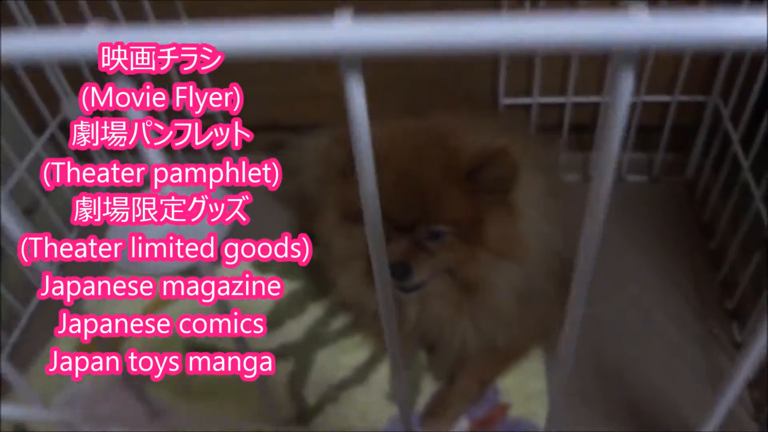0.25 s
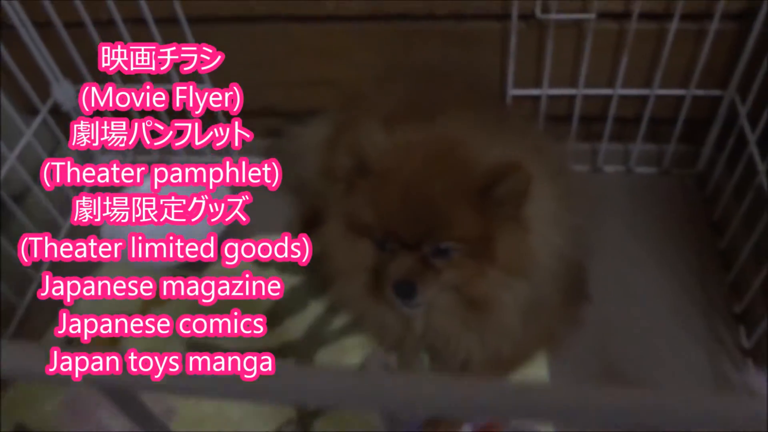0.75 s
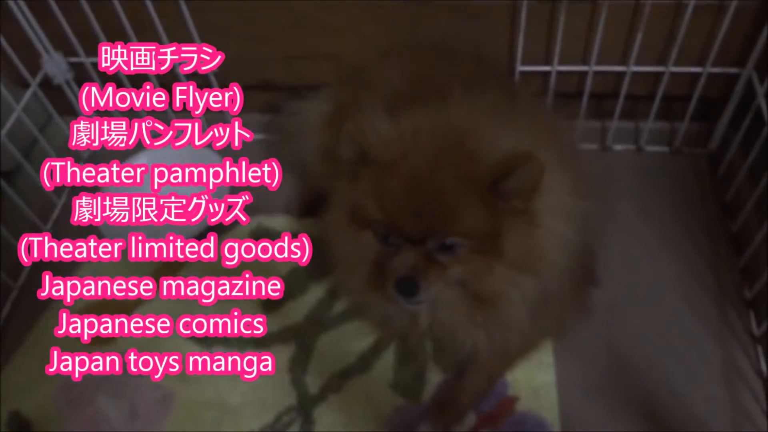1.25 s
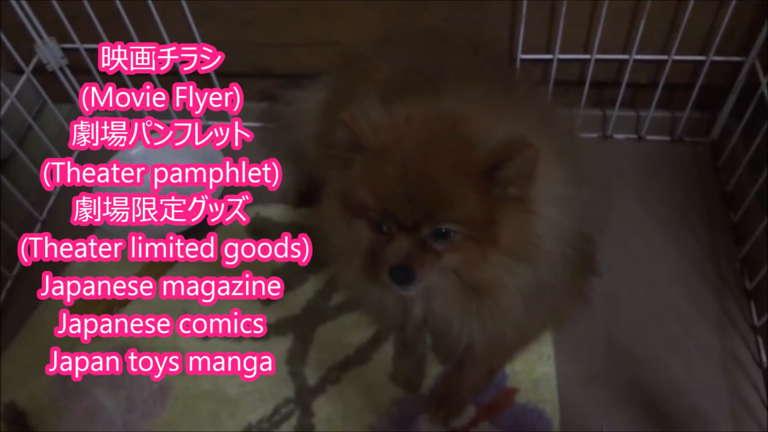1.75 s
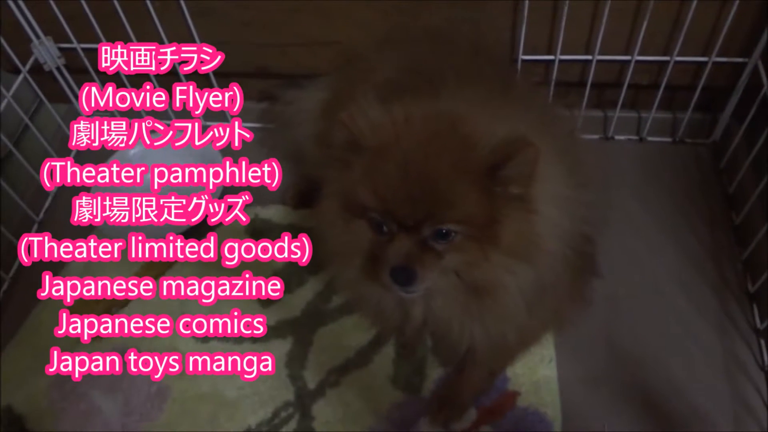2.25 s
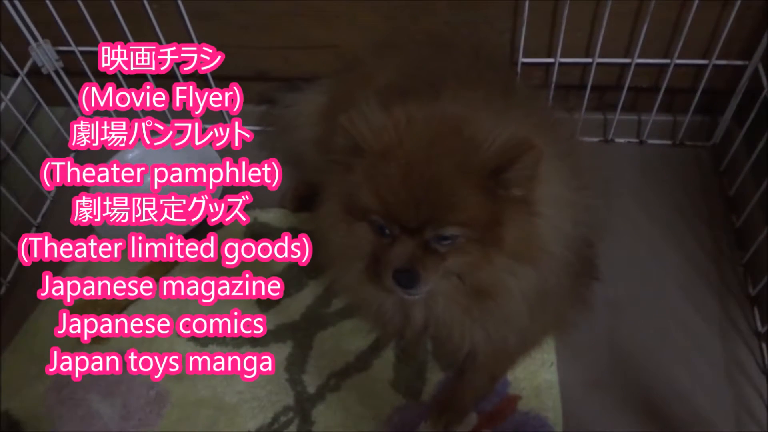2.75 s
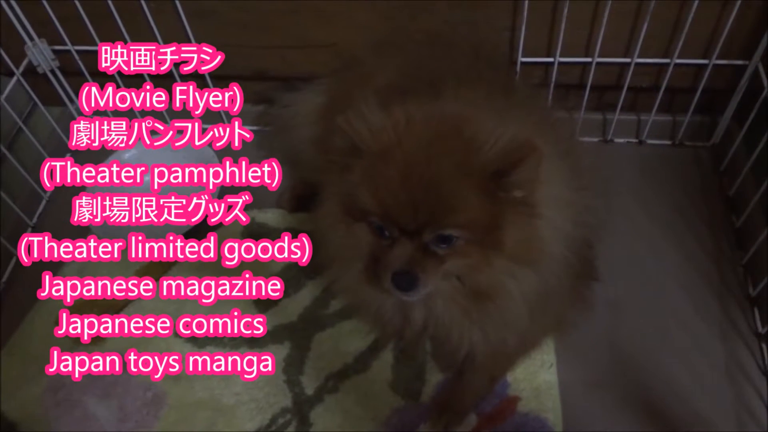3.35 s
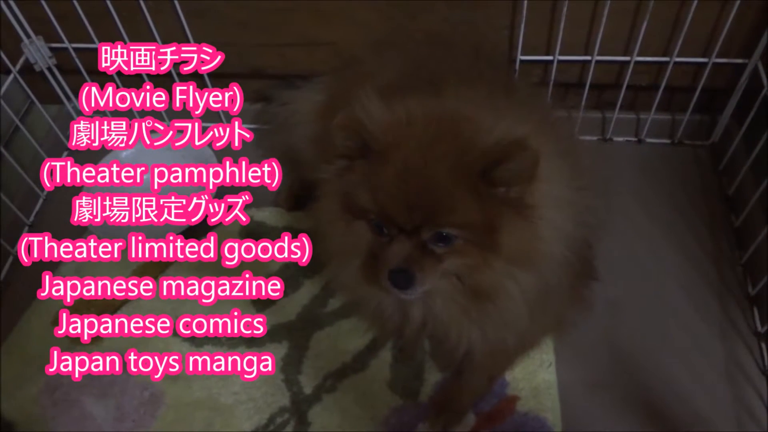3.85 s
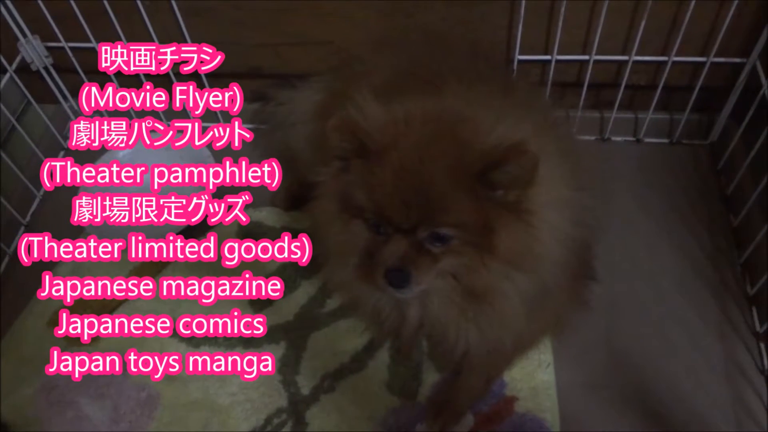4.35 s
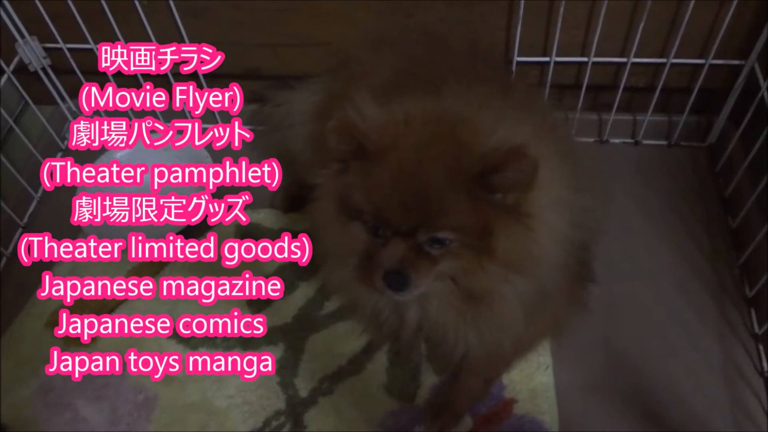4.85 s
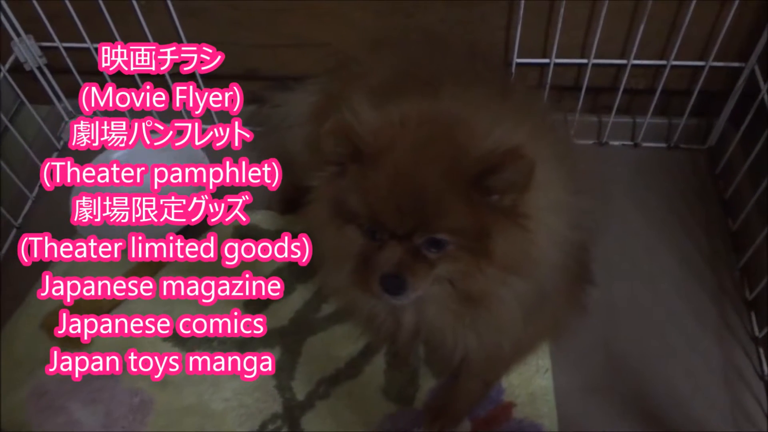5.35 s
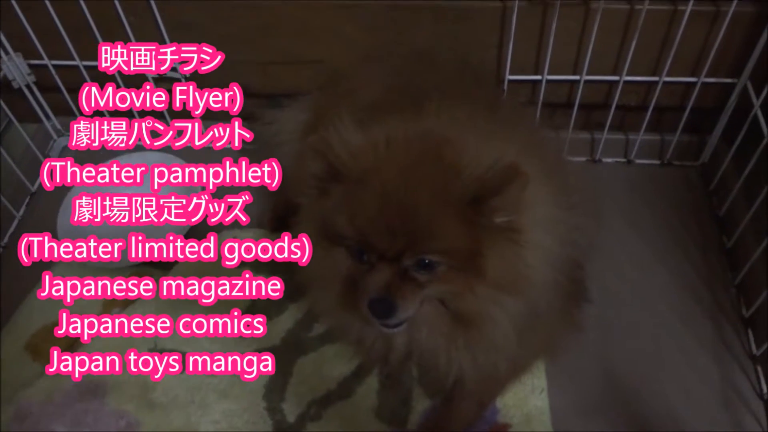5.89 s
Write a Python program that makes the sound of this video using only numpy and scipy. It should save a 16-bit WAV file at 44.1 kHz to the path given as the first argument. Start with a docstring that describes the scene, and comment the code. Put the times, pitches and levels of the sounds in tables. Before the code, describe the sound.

A small dog snorts and sniffs close by, then growls twice, first sinking into a moan, then rising into a snarl.

```python
"""A small dog snorts, grunts, sniffs and growls twice in a wire pen, close to a stereo microphone.
Each growl is a low voice chopped into throbs, about 23 a second; the first smooths out into a
sinking moan, the second opens into a snarl. Air hisses through the nose along with the voice,
and the soft palate flaps in the snorts and sniffs. Behind the dog lies a small, quiet room
with faint hiss and a low electric hum."""
import sys
import numpy as np
from scipy import signal
from scipy.fft import rfft, irfft
from scipy.io import wavfile
from scipy.ndimage import uniform_filter1d

SR = 44100
rng = np.random.default_rng(int(sys.argv[2]) if len(sys.argv) > 2 else 0)


def file_out(sig):
    """Save sig as 16-bit WAV at sys.argv[1]."""
    # one column per channel
    cols = np.atleast_2d(sig).T
    # limit, then scale
    lim = np.clip(cols, -1, 1)
    pcm = np.round(lim * 32767).astype(np.int16)
    wavfile.write(sys.argv[1], SR, pcm)


N = 269892
T = np.arange(N) / SR

# the two growls: (time [s], effort [dB], pitch [Hz], mouth resonance [dB], open share of a throb [0-1])
GROWL_1 = [(1.469, -42, 168.4, -3, 0.88), (1.523, -39.5, 170.5, -4, 0.82), (1.546, -28.5, 170.2, -8.5, 0.5),
           (1.722, -22.5, 169, -14.5, 0.44), (1.77, -26, 173.7, -11.5, 0.47),
           (1.804, -23.5, 194.4, -7.5, 0.78), (1.86, -23, 201.9, -11.5, 0.81),
           (2.089, -21, 206.5, -9.5, 0.85), (2.301, -23.5, 193.5, -9, 0.83),
           (2.761, -26, 185.8, -8.5, 0.87)]
GROWL_2 = [(5.081, -51.5, 196.6, -7, 0.14), (5.21, -47, 194.5, -4, 0.15), (5.28, -32.5, 195.5, -5.5, 0.14),
           (5.36, -28.5, 194.8, -6.5, 0.14), (5.43, -43, 196.6, -3.5, 0.14),
           (5.532, -27.5, 199.9, -5.5, 0.45), (5.599, -26, 203.4, -5.5, 0.27),
           (5.65, -23.5, 207.7, -5, .43), (5.751, -20.5, 220.6, -2, 0.46),
           (5.81, -23.5, 225.6, -0.5, 0.538), (6.11, -26, 246.1, 2, 0.57)]


def growl(jitter=0.045, pitch_bend=0.16, leak=0.059, air_db=-43, hiss_leak=0.32):
    """Breath drives the vocal folds in throbs and one held moan: returns voice, hiss and chest tone."""
    # the unbroken end of the first growl: (time [s], effort [dB], pitch [Hz], mouth resonance [dB])
    moan_path = [(2.8, -26.5, 181.2, -8.5), (2.88, -27.5, 171.2, -8.5), (2.931, -32.5, 172.2, -9),
                 (2.978, -29.5, 176.4, -4.5), (3.032, -30.5, 170.5, -14.5), (3.349, -32.5, 160.5, -9.5),
                 (3.5, -40, 140.7, -5.5), (3.54, -42.5, 127.1, -1), (3.568, -39, 113.5, -7.5)]
    attack_s, release_s = 0.018, 0.0236
    opening, throb_level, pop, chest_swell, arch = throbbing()
    effort_db, pitch, mouth_db = curves([row[:4] for row in [*GROWL_1, *moan_path, *GROWL_2]])
    moan_edge = np.minimum((T - moan_path[0][0]) / attack_s, (moan_path[-1][0] - T) / release_s)
    held = np.clip(1 + moan_edge, 0, 1)
    moan, moaning = gain_of(effort_db) * held, held > 0
    tight = T > GROWL_2[0][0]  # the throat tightens for the second growl
    rough, deep_db, nose_db = voicing(effort_db, mouth_db, moaning)
    # the pitch arches within each throb and is less steady when the voice is rough
    hz = pitch * (1 + pitch_bend * arch + jitter * np.sqrt(rough) * band(0, 255))
    turns = np.cumsum(hz) / SR
    folds = fold_pulses(turns, hz, rough)
    # a throb with a full chest tone starts softly, a thin one with a pop
    pop = 12 * pop / (1 + 2 * gain_of(deep_db) ** 2)
    # air escapes in one puff a cycle, and a little leaks between the throbs
    puff = evened(0.5 + np.exp(-(turns % 1) / 1.05))
    flow = np.maximum(opening, hiss_leak * np.sqrt(abs(uniform_filter1d(opening, size=6000)))) + held
    leakage = leak * uniform_filter1d(throb_level, size=3000) + gain_of(air_db) * flow * ~moaning
    effort = np.maximum(throb_level, leakage) + moan

    def drive(air_share):
        """Pops and fold pulses mixed with a share of turbulent air."""
        air_share = np.clip(air_share, 0, 1)
        air = np.sqrt(air_share) * puff * rng.standard_normal(N)
        return pop + effort * (np.sqrt(1 - air_share) * folds + air)

    snarl = np.interp(T, [5.59, 6.035], [0, 1])
    voice = throat(drive(rough), tight, snarl)
    voice += mouth(drive(6.1 * rough), mouth_db, tight)  # breathier than the throat
    voice += snarl * whine(throb_level, arch, mouth_db)
    hiss = breath_hiss(flow, puff, tight, nose_db, teeth_db=effort_db + mouth_db - 25)
    chest = gain_of(deep_db) * (chest_swell + moan) * chest_tone(turns, pitch)
    return voice, hiss, chest


def throbbing(softness=1.7, fall_s=0.0022, sag_s=0.15, chest_lag_s=0.00088, chest_ring_s=0.004027):
    """Each throb bursts open with a pop and sags as pressure drops; pitch peaks early, the chest later."""
    # how fast each growl throbs: (time [s], rate [throbs/s])
    rate_1 = [(1.468, 24.13), (1.56, 30.69), (1.68, 17.56), (1.79, 27.12), (1.9, 23.12), (2.3, 20.51),
              (2.5, 20.8), (2.782, 18.07)]
    rate_2 = [(5.081, 15.71), (5.18, 13.92), (5.26, 22.61), (5.34, 21.46), (5.44, 25.35), (5.76, 24.58),
              (5.9, 23.0), (6.12, 22.4)]
    opening, level, pop, chest_swell, arch = np.zeros((5, N))
    t = np.arange(SR // 10) / SR
    for start, length, db in [*throbs(rate_1, GROWL_1), *throbs(rate_2, GROWL_2)]:
        rise = softness * length ** 2  # long throbs open more gently
        gate = np.clip(t / rise, 0, 1) * np.clip((length - t) / fall_s + 0.5, 0, 1)
        gate *= np.exp((length / 2 - t) / sag_s)
        span = length + chest_ring_s
        hump = np.sin(np.pi * np.clip((t - chest_lag_s) / span, 0, 1) ** 0.98)
        progress = np.clip(t / span, 0, 1)
        add(opening, start, gate)
        add(level, start, gate * gain_of(db))
        add(pop, start + rise, gain_of([db]))
        add(chest_swell, start, hump * np.sqrt(2) * gain_of(db))
        add(arch, start, (np.sin(np.pi * progress ** 0.62) - np.pi / 4) * (progress < 1))
    return opening, level, pop, chest_swell, arch


def throbs(rate_path, growl_path, uneven_db=0.03, uneven_length=0.089):
    """The throat opens once a cycle, never twice alike: rows of (time [s], length [s], level [dB])."""
    rate = curves(rate_path)[0]
    effort_db, _, _, open_share = curves(growl_path)
    growling = (T > rate_path[0][0]) & (T < rate_path[-1][0])
    cycles = np.cumsum(rate * growling) / SR
    onsets = np.searchsorted(cycles, np.arange(cycles[-1] - 0.2), side="right")
    weaker, longer = rng.standard_normal((SR // 100, 2))[:len(onsets)].T
    length = np.clip(open_share[onsets] * (1 + uneven_length * longer), 0.05, 1) / rate[onsets]
    return np.transpose([T[onsets], length, effort_db[onsets + SR // 100] - uneven_db * weaker])


def voicing(effort_db, mouth_db, moaning, full_db=-22, voiced_from_db=-34, mouth_opens_db=-8.5):
    """Roughness, chest tone [dB] and nose hiss [dB] follow the effort and how open throat and mouth are."""
    slack_db = full_db - effort_db
    open_share = curves([*GROWL_1, *GROWL_2])[-1]
    # roughness doubles with every 8.5 dB of lost effort; the moan is nearly clean
    rough = np.where(moaning, 0.019, 0.1005) * 2 ** (slack_db / 8.5)
    # the chest tone grows with the open share and drops out when the effort is too weak to voice it
    throb_db = -16.5 + 20.5 * open_share - 2.9 * np.maximum(voiced_from_db - effort_db, 0)
    moan_db = 3 + 0.28 * slack_db  # in the moan it fades more slowly than the throat
    # the nose loses its air once the mouth opens
    nose_db = -39 - 0.58 * slack_db - 1.14 * np.maximum(mouth_db - mouth_opens_db, 0) * ~moaning
    return np.clip(rough, 0, 1), np.where(moaning, moan_db, throb_db), nose_db


def fold_pulses(turns, hz, rough, smear=0.1427, shimmer=0.26):
    """Slack vocal folds close gradually, so each pulse is smeared over part of its cycle."""
    harmonics = sum(np.cos(2 * np.pi * k * turns - smear * k ** 2) for k in range(2, 22))
    flutter = 1 + shimmer * np.sqrt(rough) * band(0, 470)
    return harmonics * 2 * np.sqrt(hz / SR) * flutter


def throat(source, tight, snarl, snarl_db=0.5):
    """The throat rings after each pulse; its resonances shift as it tightens, then opens to snarl."""
    # resonances of the three throat shapes: (frequency [Hz], level [dB])
    relaxed_tone = [(190, -31.5), (250, -7), (335, -2.5), (400, -13.5), (455, -2.5), (520, 2.5), (690, 5),
                    (800, 2.5), (900, -1), (1020, -22), (1110, -10), (1250, -14), (1700, -30.5),
                    (2000, -35), (6000, -78)]
    tight_tone = [(200, -22), (310, -9), (410, -21.5), (500, 0), (570, 3.5), (635, 7.5), (770, 2.5),
                  (860, -11.5), (1000, -20.5), (1230, -11.5), (1700, -46), (2000, -56), (6000, -77)]
    snarl_tone = [(200, -19), (300, -4), (400, -23.5), (490, 2), (560, 5.5), (630, 5), (770, 0.5),
                  (850, -2), (1250, -32), (1700, -33), (2000, -43), (6000, -73)]
    voice = colour(source * ~tight, relaxed_tone)
    voice += colour(source * tight * (1 - snarl), tight_tone)
    return voice + colour(source * snarl * gain_of(snarl_db), snarl_tone)


def mouth(source, mouth_db, tight, tight_db=-2):
    """Pulses and puffs of air ring the mouth cavity."""
    # mouth resonances: (frequency [Hz], level [dB])
    mouth_tone = [(900, -41), (1150, -18.5), (1280, -10), (1395, 1.5), (1460, -8.5), (1550, -23),
                  (1680, -14.5), (1870, -42.5), (2030, -44.5), (2800, -41.5), (2960, -33), (3150, -50.5),
                  (3500, -55), (6000, -60.5)]
    return colour(gain_of(mouth_db + tight_db * tight) * source, mouth_tone)


def whine(throb_level, arch, mouth_db, centre_hz=1386, lift_hz=60.19, wander_hz=54.47):
    """The snarling mouth sings at its own resonance, and the note lifts as each throb swells."""
    hz = centre_hz + lift_hz * arch + wander_hz * band(0, 300)
    tone = np.sqrt(2) * np.sin(2 * np.pi * np.cumsum(hz) / SR) * (1 + 0.35 * band(0, 300))
    return gain_of(mouth_db + 0.5) * uniform_filter1d(throb_level, size=160) * tone


def chest_tone(turns, pitch, low_voice_hz=183):
    """A round tone from the chest carries its octave, fuller where the voice is low."""
    octave = gain_of(np.where(pitch < low_voice_hz, -7, -22))
    return np.sqrt(2) * (np.cos(2 * np.pi * turns) + octave * np.sin(4 * np.pi * turns))


def breath_hiss(flow, puff, tight, nose_db, teeth_db, evening=0.13):
    """Air hisses through the nose and, as the lips draw back in the second growl, past the teeth."""
    # resonances of the nose and the gaps in the teeth: (frequency [Hz], level [dB])
    nose_tone = [(3000, -30.5), (3300, -5), (3600, -18.5), (4400, -9.5), (6100, -37), (7400, -8),
                 (8400, -12.5), (9300, 6), (11000, 2), (13500, -4), (16000, -11)]
    teeth_tone = [(1000, -36.5), (2200, -14), (4900, -14), (6100, -24), (6800, 6.5), (8200, 4), (9500, -9),
                  (12000, 2.5), (16000, -3)]
    # the nose evens out the bursts
    stream = (1 - evening) * flow + evening * np.sqrt(abs(uniform_filter1d(flow ** 2, size=3500)))
    nose_air = gain_of(nose_db - 3) * stream * puff * rng.standard_normal(N)
    teeth_air = gain_of(teeth_db) * stream * puff * rng.standard_normal(N)
    clicks = lip_clicks()
    return colour(nose_air + clicks * ~tight, nose_tone) + colour((teeth_air + clicks) * tight, teeth_tone)


def lip_clicks(level_db=-7, decay_s=0.0027):
    """Wet lips part in a tiny spray as a throb bursts open."""
    # partings of the lips: (time [s], level [dB])
    partings = [(1.6637, -22), (2.2396, -23.5), (2.603, -25), (5.7204, -27.5), (5.7607, -26.5),
                (6.101, -26)]
    out, t = np.zeros(N), np.arange(SR // 50) / SR
    for start, db in partings:
        add(out, start, gain_of(db + level_db) * np.exp(-t / decay_s) * rng.standard_normal(len(t)))
    return out


def snorts():
    """The palate flaps fast and, at its hardest, slaps the back of the throat."""
    # bouts of flapping: (start [s], length [s], rate [flaps/s], level [dB])
    bouts = [(.2265, 0.164, 73.6, -9.5), (.493, 0.017, 73, -33)]
    # airway resonances in a snort: (frequency [Hz], level [dB])
    tone = [(150, -11), (400, -17), (540, -10.5), (700, 3.5), (850, -3), (1100, -1.5), (1370, 3.5),
            (1700, -12), (2400, -21.5), (3000, -10.5), (3700, -27), (4500, -20.5), (10000, -31.5),
            (15500, -31)]
    # the hardest slaps: (time [s], level [dB])
    slaps = [(0.3216, 1), (.3505, -11), (0.3843, -5.5)]
    drive = palate_flaps(bouts, level_db=-9, decay_s=0.0081, slap=7.9, rise_s=0.0011, swell_db=6,
                         fade_db=18, stream_db=-14.5, lead_s=0.036, crest=0.76)
    for start, db in slaps:
        add(drive, start, gain_of([db]))
    return colour(drive, tone)


def grunt():
    """Slower flaps of the palate swell and die away steeply."""
    # one bout of flapping: (start [s], length [s], rate [flaps/s], level [dB])
    bouts = [(.8695, 0.13, 44.8, -20)]
    # airway resonances in the grunt: (frequency [Hz], level [dB])
    tone = [(200, 3.5), (450, -13.5), (720, 10), (1150, 15.5), (1550, -2), (2020, -4.5), (2700, -2),
            (3700, -11), (4500, -10.5), (12000, -34)]
    drive = palate_flaps(bouts, level_db=-7.5, decay_s=0.0062, slap=7.9, rise_s=0.0011, swell_db=18,
                         fade_db=42, stream_db=-25, lead_s=0.03, crest=0.77)
    return colour(drive, tone)


def sniffs():
    """Short breaths set the palate flapping lightly, with a brighter ring."""
    # bouts of flapping: (start [s], length [s], rate [flaps/s], level [dB])
    bouts = [(.781, .09, 44, -30), (1.176, .117, 51, -19), (1.299, .054, 57, -18), (1.412, .02, 50, -32)]
    # airway resonances in a sniff: (frequency [Hz], level [dB])
    tone = [(400, -34), (900, 0.5), (1150, -10), (1380, 9), (1720, -3), (1970, 18), (2220, -4), (2750, 7.5),
            (3350, -5), (3700, -14), (4450, -4.5), (5500, -45), (12000, -69)]
    drive = palate_flaps(bouts, level_db=-6, decay_s=0.0033, slap=1.6, rise_s=0.0017, swell_db=9.5,
                         fade_db=8, stream_db=-25.5, lead_s=0.082, crest=0.8)
    return colour(drive, tone)


def palate_flaps(bouts, level_db, decay_s, slap, rise_s, swell_db, fade_db, stream_db, lead_s, crest):
    """A stream of air swells, fades and sets the palate flapping; each flap is a slap and a short gush."""
    drive, t = np.zeros(N), np.arange(SR // 20) / SR
    for start, length, rate, db in bouts:
        stream = swell(start - lead_s, start + length + lead_s / 2) * rng.standard_normal(N)
        drive += gain_of(db + level_db + stream_db) * stream
        count = max(round(length * rate), 1)
        for k in range(count):
            past = (k + 0.5) / count - crest  # crest: the share of a bout at which it is strongest
            drop_db = swell_db * (past / crest) ** 2 if past < 0 else fade_db * (past / (1 - crest)) ** 2
            gush = rng.standard_normal(len(t)) * (1 - np.exp(-t / rise_s)) * np.exp(-t / decay_s)
            gush[SR // 1000] += slap
            add(drive, start + k / rate, gain_of(db + level_db - drop_db) * gush)
    return drive


def huffs():
    """The low voice sinks under the snort and the grunt."""
    # voiced breaths: (start [s], end [s], first pitch [Hz], last pitch [Hz], level [dB])
    notes = [(0.163, 0.258, 226, 190, -39), (.235, 0.351, 174.1, 130.6, -26.5),
             (.32, 0.414, 131.9, 93.5, -32), (0.84, 0.984, 92.2, 84, -43)]
    return glides(notes, overtone_db=-10.5, unsteady=0.079)


def whistles():
    """Air through the narrow nostrils swells and fades in fuzzy bands."""
    # rushes of air: (start [s], length [s], centre [Hz], width [Hz], level [dB])
    rushes = [(0, 0.47, 6950, 900, -56.5), (0.135, 0.2, 10700, 3600, -48), (0.724, 0.16, 2930, 900, -52.5),
              (1.46, 0.24, 11040, 4500, -52.5), (4.799, 1.064, 11100, 5498, -61)]
    return sum(gain_of(db) * band(hz, width) * swell(start, start + length)
               for start, length, hz, width, db in rushes)


def squeaks():
    """The nostrils squeak in thin, nearly pure tones."""
    # nostril notes: (start [s], end [s], first pitch [Hz], last pitch [Hz], level [dB])
    notes = [(.113, .133, 1470, 1320, -45), (.126, .205, 820, 730, -42), (1.23, 1.247, 2550, 2660, -39),
             (1.447, 1.47, 2780, 2627, -48.5)]
    return glides(notes, overtone_db=-28, unsteady=0.052)


def pen(hiss):
    """The hiss bounces off the tray and sides of the pen."""
    # near reflections: (delay [s], level [dB])
    bounces = [(.0021, -8), (.0037, -11.5), (.0062, -13.5)]
    return hiss + echoes(hiss, bounces)


def room(x, wet_db, width=0.35):
    """A small room adds two wall echoes and a short tail; width sets how its left and right differ."""
    # wall reflections: (delay [s], level [dB])
    walls = [(.0165, -21), (.0235, -22.5)]
    # reverberation: (frequency [Hz], time to fall 60 dB [s])
    decay_times = [(200, 0.55), (600, 0.16), (3000, 0.36), (10000, 0.24)]
    taps = rng.standard_normal((2, SR // 2)) * (np.arange(SR // 2) > SR * 0.003)
    hz, t, spectrum = signal.stft(taps, SR, nperseg=256)
    decay = gain_of(-60 * t / read(decay_times, hz)[:, None])
    mid, side = signal.istft(spectrum * decay, SR, nperseg=256)[1]
    tail = np.array([mid + width * side, mid - width * side]) / np.linalg.norm(mid)
    return x + echoes(x, walls) + gain_of(wet_db) * signal.fftconvolve(x[None], tail, axes=1)[:, :N]


def room_tone(hiss_db=-61, hum_hz=62.5, hum_db=-58.5):
    """Faint, wide hiss and a low electric hum in the centre."""
    # noise floor of the quiet room: (frequency [Hz], relative level [dB])
    floor_tone = [(25, 2.5), (80, -0.5), (140, -5), (700, -6.5), (2500, -10), (6400, -17), (15500, -20.5)]
    mid, side = (evened(colour(rng.standard_normal(N), floor_tone)) for _ in range(2))
    hum = np.sqrt(2) * np.sin(2 * np.pi * hum_hz * T) * (1 + 0.068 * band(0, 8.2))
    return gain_of(hum_db) * hum + gain_of(hiss_db) * np.array([mid + side, mid - side])


def glides(notes, overtone_db, unsteady):
    """Short wavering tones that swell, slide in pitch and fade."""
    out, waver = np.zeros(N), 1 + unsteady * band(0, 232)
    for start, end, first_hz, last_hz, db in notes:
        hz = np.interp(T, [start, end], [first_hz, last_hz]) * waver
        phase = 2 * np.pi * np.cumsum(hz) / SR
        tone = np.cos(phase) + gain_of(overtone_db) * np.cos(2 * phase)
        out += gain_of(db) * swell(start, end) * np.sqrt(2) * tone
    return out


def echoes(x, reflections):
    """Delayed, weaker copies of a sound."""
    out = np.zeros(N)
    for delay, db in reflections:
        add(out, delay, gain_of(db) * x)
    return out


def colour(x, points, size=4096):
    """A causal filter of unit energy: it rings after each pulse, like a cavity."""
    log_gain = np.log(gain_of(read(points, abs(np.fft.fftfreq(size, 1 / SR)))))
    minimum_phase = np.exp(np.conj(signal.hilbert(log_gain)))
    taps = np.fft.ifft(minimum_phase).real[:size // 2]
    return signal.oaconvolve(x, taps / np.linalg.norm(taps))[:N]


def band(hz, width_hz):
    """Noise of rms 1 in a soft band; around 0 Hz it is a slow wander."""
    detuning = 2 * (np.fft.rfftfreq(N, 1 / SR) - hz) / width_hz
    return evened(irfft(rfft(rng.standard_normal(N)) / (1 + detuning ** 2) ** 1.5, N))


def swell(start, end):
    """A half sine in time, from start to end."""
    return np.sin(np.pi * np.clip((T - start) / (end - start), 0, 1))


def curves(rows):
    """Every column of a table in time, sample by sample."""
    times, *columns = np.transpose(rows)
    return [np.interp(T, times, column) for column in columns]


def read(points, hz):
    """A spectrum table on a log-frequency axis."""
    table_hz, values = np.transpose(points)
    return np.interp(np.log(hz + 1), np.log(table_hz), values)


def add(mix, start_s, sound):
    """Mixes a sound in at its start time."""
    part = mix[max(round(start_s * SR), 0):][:len(sound)]
    part += sound[:len(part)]


def gain_of(db):
    """Decibels to a factor."""
    return 10 ** (np.asarray(db) / 20)


def evened(x):
    """Scaled to rms 1."""
    return x / np.sqrt(np.mean(x ** 2) + 1e-20)


def scene():
    """The dog close by, in the middle of the room; its low tones reach the microphone almost directly."""
    voice, hiss, chest = growl()
    nose = snorts() + grunt() + sniffs() + whistles() + squeaks()
    dog = room(voice, wet_db=-5.5) + room(pen(hiss), wet_db=-9, width=0.26) + room(nose, wet_db=-6)
    dog += room(chest + huffs(), wet_db=-27.5, width=0.7)
    return dog + room_tone()


def record(dry, edge_hz=15950):
    """The recorder's band limit cuts off the highest treble."""
    lowpass = signal.firwin(511, edge_hz, window=("kaiser", 9), fs=SR)
    return signal.oaconvolve(dry, lowpass[None], "same")


dry = scene()
out = record(dry)
file_out(out)
```